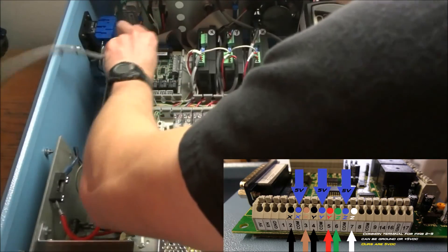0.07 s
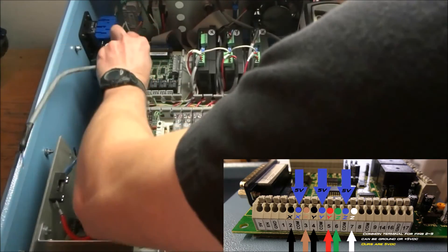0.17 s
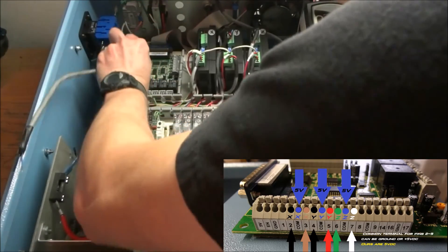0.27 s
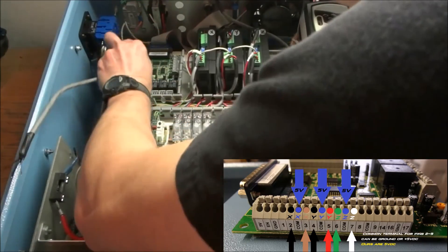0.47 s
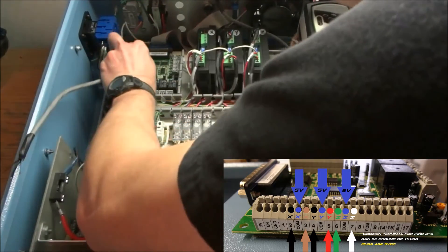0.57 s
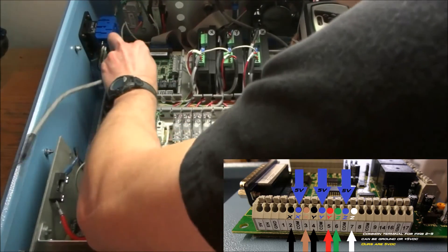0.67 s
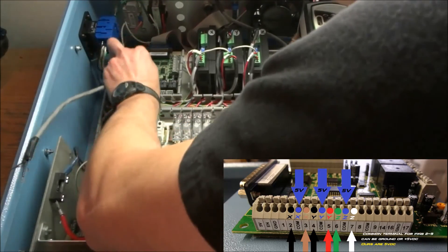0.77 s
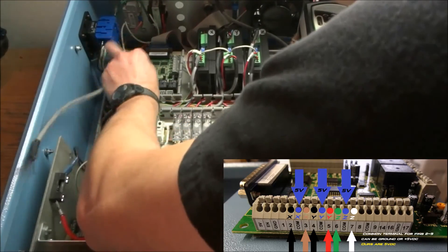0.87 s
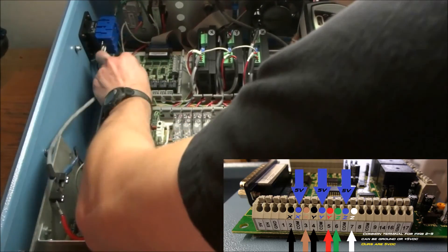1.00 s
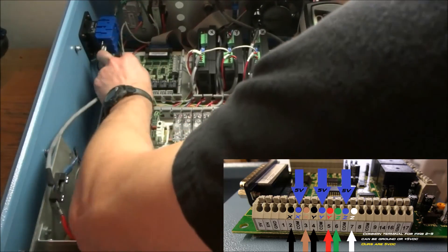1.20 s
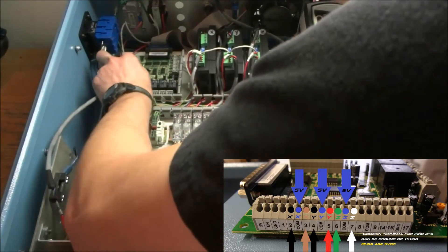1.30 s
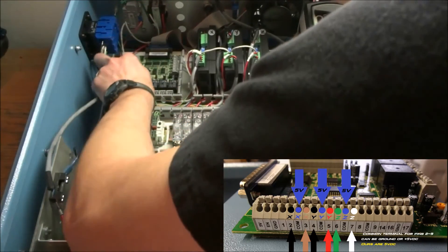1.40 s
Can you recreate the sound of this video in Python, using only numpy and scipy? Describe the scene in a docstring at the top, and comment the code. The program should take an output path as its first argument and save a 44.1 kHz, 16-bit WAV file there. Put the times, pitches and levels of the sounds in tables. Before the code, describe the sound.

Clicks and clatter of wires pushed into terminals in a metal enclosure, with one hard clack.

```python
"""A hand pushes wires into plastic terminals inside a steel control box, in a quiet workshop.
Each push clatters in the terminals, rings the steel panels and dies away in the room. Hollow knocks
press a wire home, then a clamp snaps shut with a hard clack. In between, the wires tick and the arm
rubs and bumps softly on the housing, over a low room tone."""
import sys
import numpy as np
from scipy import signal
from scipy.fft import rfft, irfft, next_fast_len
from scipy.io import wavfile
from scipy.ndimage import map_coordinates

SR = 44100
rng = np.random.default_rng(int(sys.argv[2]) if len(sys.argv) > 2 else 0)


def unload_wav(signal):
    """Save mono or channel-first audio to the path in sys.argv[1] as 16-bit WAV at rate SR, clipped to [-1, 1]."""
    wavfile.write(
        sys.argv[1],
        SR,
        np.round(np.clip(np.atleast_2d(signal).T, -1, 1) * 32767).astype(np.int16),
    )


N = 63945
RING_RISE_S = 0.0054
# stereo width of the box (frequency [Hz], side against middle [dB])
BOX_WIDTH = [(100, -17), (300, -29), (700, -11.5), (2000, -13), (6000, -11.5), (14000, -15)]


def amp(db):
    """Decibels to gain."""
    return 10 ** (np.asarray(db) / 20)


def along(points, hz):
    """Read a curve of (frequency, value) points on a log frequency axis."""
    freqs, values = np.transpose(points)
    return np.interp(np.log(hz + 1), np.log(freqs + 1), values)


def add(out, start_s, sound):
    """Mix a sound into out from start_s on."""
    i = int(round(start_s * SR))
    out[:, i:] += sound[:, :N - i]


def noise(colour_db, width=BOX_WIDTH):
    """Mid/side stereo noise, coloured by a dB function of frequency."""
    size = next_fast_len(N + 8192)
    hz = np.fft.rfftfreq(size, 1 / SR)
    gain = amp([colour_db(hz), colour_db(hz) + along(width, hz)])
    mid, side = irfft(rfft(rng.standard_normal((2, size))) * gain, size)[:, :N]
    return np.array([mid + side, mid - side])


def bed(colour, width):
    """Steady stereo noise whose middle has rms 1."""
    wash = noise(lambda hz: along(colour, hz), width)
    return wash / wash.mean(axis=0).std()


def contact(colour_db, crack_db, crack_s=0.005):
    """A short mono crack and the dense ringing of box and room, treble dying first."""
    # decay of box and room (frequency [Hz], t60 [s])
    decay = [(100, 0.3), (500, 0.38), (1400, 0.37), (3700, 0.29), (10000, 0.24), (15000, 0.15)]
    hz, times, spectrum = signal.stft(noise(colour_db), SR, nperseg=512)
    fade = amp(-60 * times / along(decay, hz)[:, None])
    tail = signal.istft(spectrum * fade, SR, nperseg=512)[1][:, :N]
    crack = noise(colour_db).mean(axis=0) * amp(crack_db) * np.exp(-np.arange(N) / SR / crack_s)
    return tail + crack


def ring(modes, rise_s, scatter_db=1.5, spread=0.054):
    """Damped modes that swell in, with fresh level, pan and phase at every blow."""
    t, out = np.arange(N) / SR, np.zeros((2, N))
    for (hz, db, t60), (scatter, pan, phase) in zip(modes, rng.standard_normal((len(modes), 3))):
        wave = np.sin(2 * np.pi * (hz * t + phase)) * np.exp(-np.log(1000) * t / t60)
        out += np.outer([1 + spread * pan, 1 - spread * pan], amp(db + scatter_db * scatter) * wave)
    return out * (1 - np.exp(-t / rise_s))


def box_colour(ripple_hz=45, ripple_db=3.2):
    """The box's EQ curve in dB, rippled by its countless small resonances."""
    # dense ringing of the box (frequency [Hz], level [dB])
    body = [(50, -33.5), (110, -24), (180, -12), (270, -2.5), (480, 2), (650, 4.5), (950, 0), (1300, -0.5),
            (1500, -7.5), (1900, 1), (3100, 2.5), (5200, -2), (6800, -3), (9000, -3.5), (10500, 2),
            (12500, 0), (15000, -13.5)]
    knots = rng.standard_normal(int(SR / ripple_hz))
    ripple = lambda hz: np.interp(hz / ripple_hz, np.arange(len(knots)), knots)
    depth_db = lambda hz: ripple_db * hz / (hz + 600)  # smoother in the bass
    return lambda hz: along(body, hz) + depth_db(hz) * ripple(hz)


def terminal_lift(hz, width_hz=90):
    """Narrow EQ peaks and one notch, in dB, from the terminals and wires."""
    # terminal and wire resonances (centre [Hz], lift [dB])
    resonances = [(1700, 8), (2140, -11.5), (2380, 1.5), (3000, 3), (3610, 6), (4520, 6), (5030, 8.5),
                  (5980, 8), (6280, 5.5), (7810, 4.5), (10090, 3), (10230, 9), (11050, 7)]
    return sum(db * np.exp(-((hz - centre) / width_hz) ** 2) for centre, db in resonances)


def room_tone(level_db=-68):
    """The still air of the workshop: a low, diffuse bed."""
    # colour of the air (frequency [Hz], level [dB])
    colour = [(15, -40), (25, -1.5), (75, -6.5), (359, -10), (1500, -22.5), (4620, -28.5), (15500, -35.5)]
    # its stereo width (frequency [Hz], side against middle [dB])
    width = [(50, -21), (300, 6), (2000, 8), (10000, -8.5)]
    return amp(level_db) * bed(colour, width)


def arm_rub(gain_db=4, lump_db=1.8, lumps_per_s=28):
    """Dull, uneven rubbing of arm and cable on the housing."""
    # swells of the rubbing (time [s], level [dB])
    swells = [(0, -91), (.13, -80), (.2, -55.5), (.38, -59.5), (0.531, -62.5), (.58, -64), (.67, -59.5),
              (0.739, -70.5), (0.878, -53), (.96, -58), (1.05, -48), (1.14, -62.5), (1.23, -62.5),
              (1.36, -62.5), (1.45, -69)]
    # colour of the rumble (frequency [Hz], level [dB])
    colour = [(30, -10), (70, -16), (105, 1), (150, -2), (220, -10.5), (420, -2), (800, -14), (1600, -25),
              (4000, -32.5), (12000, -43)]
    t = np.arange(N) / SR
    swell_db = np.interp(t, *np.transpose(swells))
    knots = rng.standard_normal(int(t[-1] * lumps_per_s) + 4)
    lumps = map_coordinates(knots, [t * lumps_per_s])
    return amp(gain_db + swell_db + lump_db * lumps) * bed(colour, BOX_WIDTH)


def light_touches(box_db, lift_share=0.48):
    """Wire ticks, faint slides and fingertip bumps, each with one hump of colour."""
    # wire and finger contacts (time [s], attack [s], level [dB], centre [Hz], width [oct], crack [dB])
    touches = [ (.1550, 0.016, -36.5, 228, 2.47, -2), (0.163, 0.02, -37.5, 2870, 0.17, 6),
               (0.188, 0.0027, -15.5, 124, 0.92, -19), (0.4053, 0.0045, -47.5, 2802, 0.8, 12),
               (.4080, 0.0053, -46, 5060, 0.062, -2.5), (.5600, 0.0037, -38.5, 324, 1.02, -1.5),
               (0.637, 0.0066, -31.5, 283, 0.12, -6), (0.6517, 0.0007, -68, 2400, 0.73, 12),
               (0.926, 0.029, -25.5, 400, 1.18, -16), (0.924, 0.0078, -45, 2400, 0.87, 3),
               (0.9576, 0.001, -34.5, 3550, 0.2, 17.5), (0.996, 0.0035, -4, 110, 0.22, 0),
               (1.2011, 0.00085, -51, 2830, 1.11, 8.5), (1.3146, .001, -66.5, 3400, 0.83, 16.5),
               (1.3184, 0.0041, -42, 490, 0.97, 16.5), (1.3505, 0.00029, -50, 644, 0.71, 20),
               (1.427, 0.00085, -69, 4170, 0.43, 22), ]
    t, out = np.arange(N) / SR, np.zeros((2, N))
    for start, attack, db, centre_hz, width, crack_db in touches:
        hump_db = lambda hz: db - 20 * np.log10(1 + (np.log2((hz + 1) / centre_hz) / width) ** 4 / 2)
        touch = contact(lambda hz: hump_db(hz) + box_db(hz) + lift_share * terminal_lift(hz), crack_db)
        add(out, start, touch * (1 - np.exp(-t / attack)))
    return out


def hollow_knocks():
    """Short hollow knocks as the wire is pressed home, damped by the hand."""
    # knocks of the terminal block (time [s], pitch [Hz], level [dB], t60 [s])
    knocks = [(0.957, 550, -20, 0.037), (.9600, 653.5, -33.5, 0.12), (.9640, 428.8, -32.5, 0.21),
              (0.993, 418, -19, 0.073)]
    out = np.zeros((2, N))
    for start, hz, db, t60 in knocks:
        add(out, start, ring([(hz, db, t60)], RING_RISE_S))
    return out


def clamp_snap(box_db, start_s=1.0153, attack_s=0.00041):
    """The clamp snaps shut with a hard midrange clack and rings on its mount."""
    # force of the snap (frequency [Hz], level [dB])
    force = [(250, -22), (480, -25.5), (620, -24), (1200, -19.5), (2300, -23), (3200, -33), (4700, -21),
             (6300, -36), (7400, -28), (9500, -49), (14000, -46)]
    # modes of clamp and mount (frequency [Hz], level [dB], t60 [s])
    modes = [(294.5, -41, 0.54), (613.7, -34.5, 0.28), (652, -29, 0.13), (747, -30.5, 0.2),
             (1150, -32, 0.2), (1363, -41.5, 0.24), (2070, -35, 0.17), (2344, -34.5, 0.18)]
    t, out = np.arange(N) / SR, np.zeros((2, N))
    clack = contact(lambda hz: along(force, hz) + box_db(hz), crack_db=9)
    ringing = ring(modes, RING_RISE_S)
    add(out, start_s, (clack + ringing) * (1 - np.exp(-t / attack_s)))
    return out


def wire_pushes(box_db):
    """Firm pushes clatter in the terminals and ring the panels, which bloom later after a slow push."""
    # pushes (time [s], attack [s], force in each of six bands [dB], panel ring [dB],
    # panel roll-off [Hz], crack [dB])
    pushes = [ (0.1876, 0.0011, -24.5, -29, -24.5, -38.5, -53.5, -61.5, -4.5, 900, 0),
              (0.2225, 0.0065, -26.5, -21, -18.5, -28.5, -31.5, -26, 9.5, 3000, 14),
              (.2480, 0.0037, -15, -23.5, -19, -29, -43, -33.5, -13, 1500, -7),
              (.2690, 0.0017, -18.5, -31, -27.5, -37, -40.5, -39, -12.5, 1300, -3),
              (.7590, 0.0049, -50, -37, -44.5, -36.5, -39, -38, -15, 2007, 12.5),
              (.7660, 0.00083, -35, -30, -36.5, -34.5, -41, -68, 11, 690, -6),
              (0.9575, 0.00069, -25.5, -35, -39.5, -33, -38.5, -46.5, -4.5, 700, 6),
              (0.9726, 0.00096, -26.5, -33, -33.5, -37.5, -35.5, -36, -14, 900, 3), ]
    # bands of that force (frequency [Hz])
    bands = [250, 600, 1150, 2800, 6500, 11500]
    # modes of the steel panels (frequency [Hz], level [dB], t60 [s])
    panel_modes = [(225.6, -24, 0.39), (268, -11, 0.22), (283.3, -14.5, 0.39), (364, -12, 0.32),
                   (409, -6.5, 0.39), (529, -25.5, 0.34), (672, -14, 0.36), (751, -11.5, 0.29),
                   (920.5, -21.5, 0.19), (1064.6, -21.5, 0.35), (1200, -14.5, 0.32), (1253, -20, 0.35),
                   (1615, -11.5, 0.14), (1950, -11.5, 0.25), (2848, -10, 0.28)]
    t, out = np.arange(N) / SR, np.zeros((2, N))
    for start, attack, *force, ring_db, rolloff_hz, crack_db in pushes:
        force_db = lambda hz: along(list(zip(bands, force)), hz)
        clatter = contact(lambda hz: force_db(hz) + box_db(hz) + terminal_lift(hz), crack_db)
        # a soft push reaches only the low modes
        soft_db = lambda hz: -10 * np.log10(1 + (hz / rolloff_hz) ** 6)
        modes = [(hz, db + ring_db + force_db(hz) + soft_db(hz), t60) for hz, db, t60 in panel_modes]
        panels = ring(modes, RING_RISE_S + 2 * attack)
        add(out, start, (clatter + panels) * (1 - np.exp(-t / attack)))
    return out


def scene(balance_db=0.04):
    """The handwork over the room tone; pushes, snap and touches share one box colour."""
    box_db = box_colour()
    work = wire_pushes(box_db) + hollow_knocks() + clamp_snap(box_db) + light_touches(box_db) + arm_rub()
    return work * amp([[balance_db], [-balance_db]]) + room_tone()


def record(dry, top_hz=15850):
    """A brick-wall low-pass takes the very top off the mix."""
    size = next_fast_len(N + 8192)
    passband = np.fft.rfftfreq(size, 1 / SR) < top_hz
    return irfft(rfft(dry, size) * passband, size)[:, :N]


dry = scene()
out = record(dry)
unload_wav(out)
```